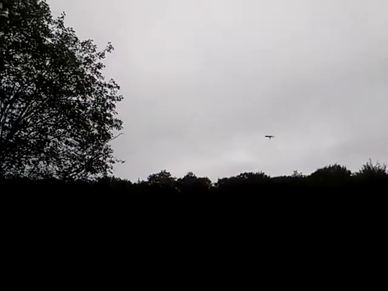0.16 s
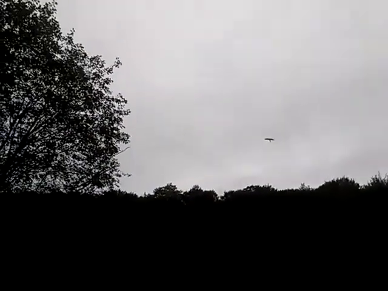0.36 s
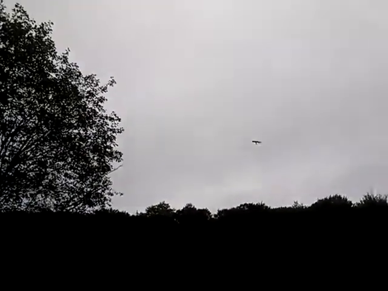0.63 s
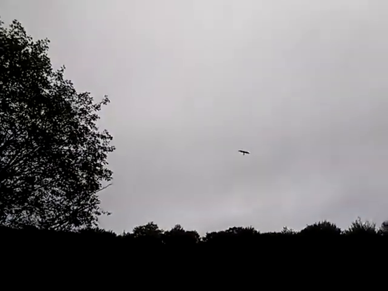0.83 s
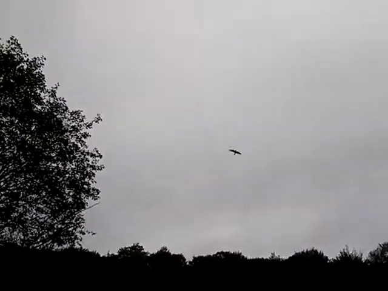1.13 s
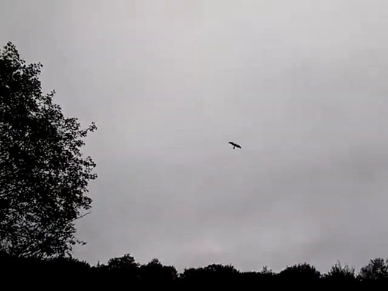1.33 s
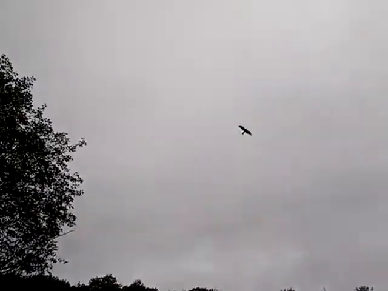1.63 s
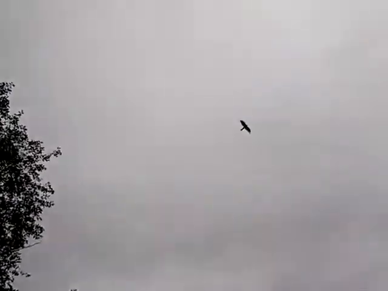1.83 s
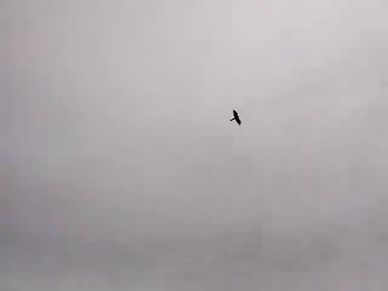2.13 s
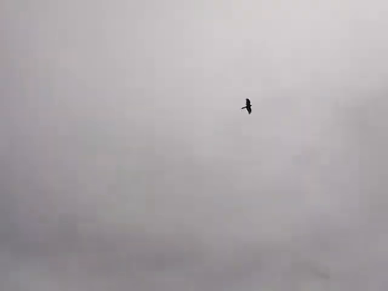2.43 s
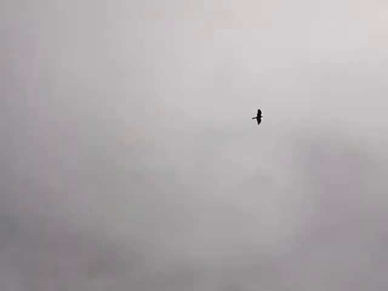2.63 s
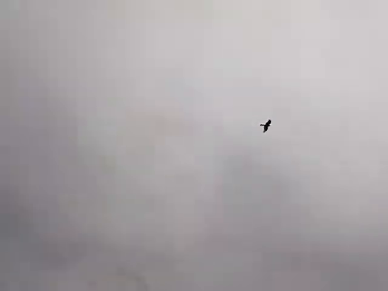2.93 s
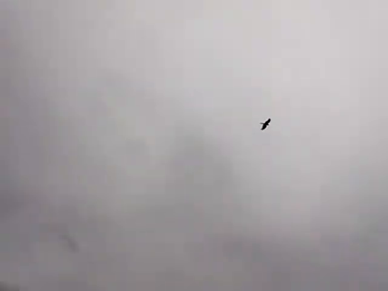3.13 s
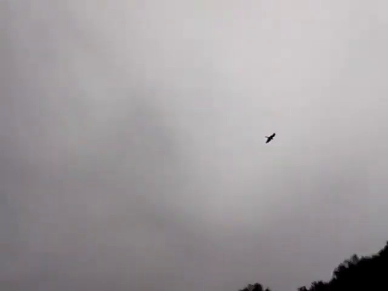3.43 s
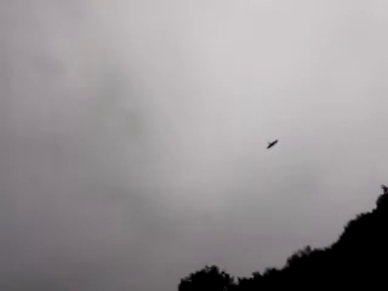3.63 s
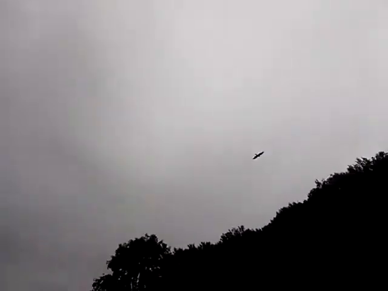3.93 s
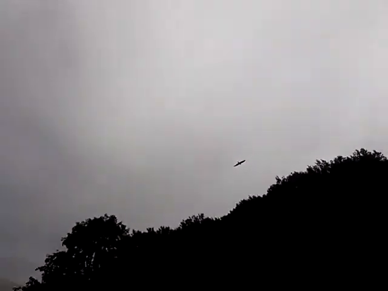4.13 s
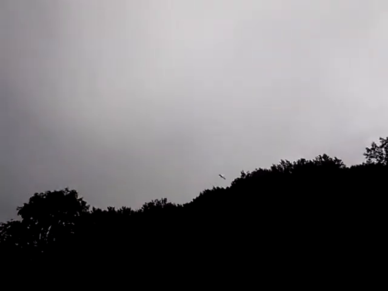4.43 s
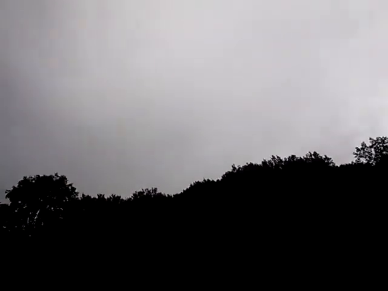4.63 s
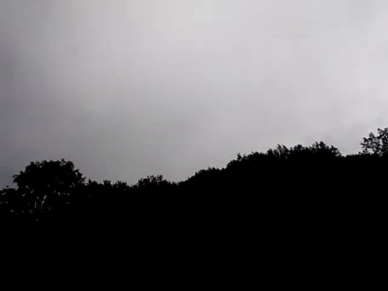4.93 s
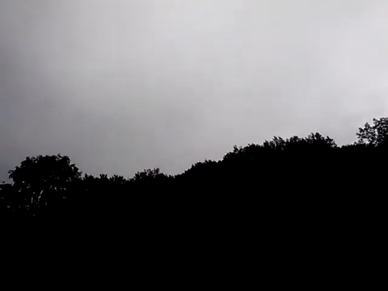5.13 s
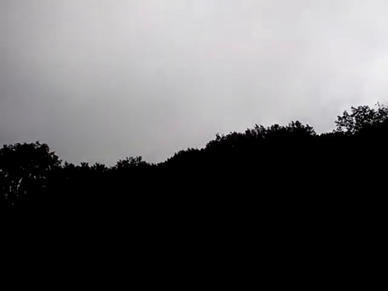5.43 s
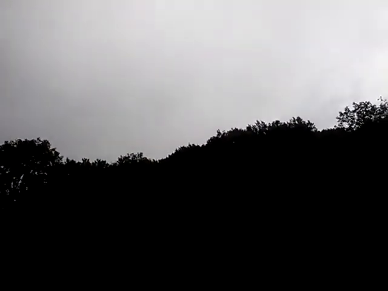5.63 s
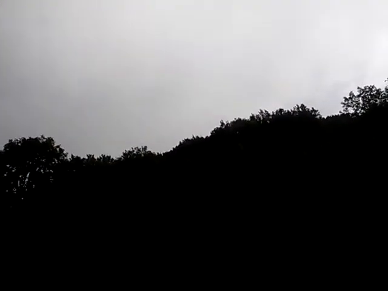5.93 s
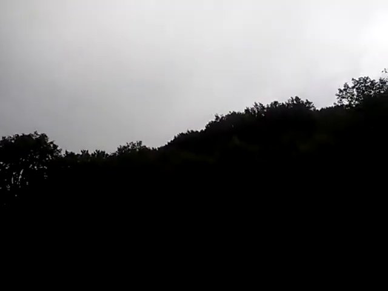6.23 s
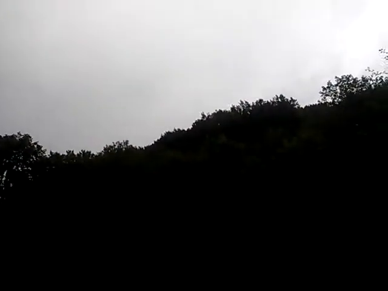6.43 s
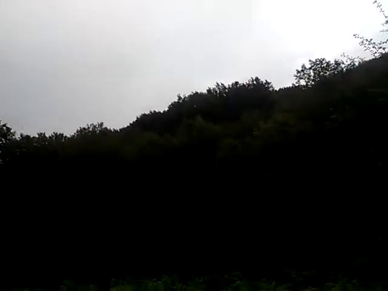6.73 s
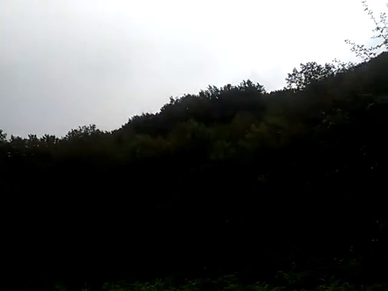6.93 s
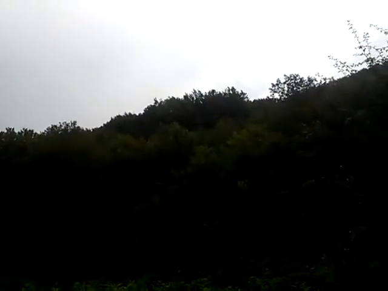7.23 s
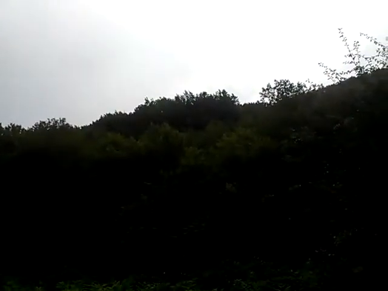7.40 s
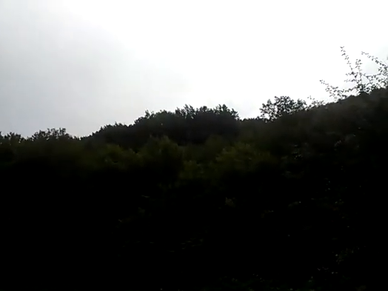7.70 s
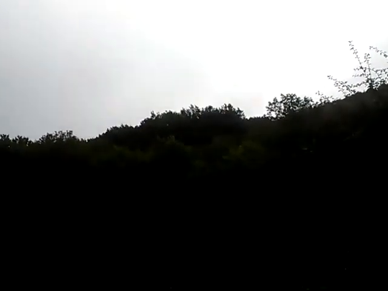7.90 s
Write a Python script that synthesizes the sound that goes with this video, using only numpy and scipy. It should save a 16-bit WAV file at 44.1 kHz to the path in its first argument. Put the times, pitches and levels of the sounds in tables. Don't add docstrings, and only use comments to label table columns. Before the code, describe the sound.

Outdoors by a wooded hill, a bird of prey mews five times: two strong, clear calls in open sky, then three weaker, more echoing ones from the trees. Leaves hiss faintly far off. At the hand-held microphone, light wind pops flutter between calls, a strap squeaks in small high creaks, and a jacket rustles most strongly near the end, after the last call.

```python
import sys
import numpy as np
from scipy import signal
from scipy.fft import rfft, irfft
from scipy.io import wavfile
from scipy.ndimage import uniform_filter1d, map_coordinates

SR = 44100
rng = np.random.default_rng(int(sys.argv[2]) if len(sys.argv) > 2 else 0)


def wrap_up_sound(samples):
    columns = np.atleast_2d(samples).T
    tamed = np.clip(columns, -1, 1)
    steps = np.round(tamed * 32767).astype(np.int16)
    wavfile.write(sys.argv[1], SR, steps)


def attenuation_scalar(level_db):
    decades = np.asarray(level_db, float) / 20
    return 10 ** decades


N = 355438
T = np.arange(N) / SR


def curve(table, column=1, off=-120):
    rows = np.array(table, float)
    return np.interp(T, rows[:, 0], rows[:, column], left=off, right=off)


def unit(x):
    return x / np.sqrt(np.mean(x ** 2))


def walk(rate):
    hold = max(int(SR / rate), 1)
    steps = np.repeat(rng.standard_normal(N // hold + 1), hold)
    slewed = uniform_filter1d(uniform_filter1d(steps, hold), hold)
    return unit(slewed[:N])


def swell(rows):
    gain = 0
    for peak_s, db, rise_s, fall_s in rows:
        away = np.where(T < peak_s, (peak_s - T) / rise_s, (T - peak_s) / fall_s)
        gain = gain + attenuation_scalar(db - 20 * np.minimum(away, 3) ** 2)
    return gain


def colour(x, points, lo_hz=0, hi_hz=SR):
    hz = np.arange(N // 2 + 1) * SR / N + 1e-3
    point_hz, point_db = np.transpose(points)
    gain = attenuation_scalar(np.interp(np.log(hz), np.log(point_hz), point_db))
    if lo_hz:
        across = np.clip(np.log(hz / lo_hz) / np.log(hi_hz / lo_hz), 0, 1)
        gain = gain * np.sin(np.pi * across)
    return irfft(rfft(x) * gain, N)


def band(x, hz, width_hz):
    return signal.lfilter(*signal.iirpeak(hz, hz / width_hz, fs=SR), x)


def wavelets(times, sizes, hz, spread_s, skew):
    half = 800
    out, k = np.zeros(N + 2 * half), np.arange(-half, half)
    u = k / SR
    bell = np.exp(-.5 * (u / spread_s[:, None]) ** 2)
    packet = bell * np.cos(2 * np.pi * hz[:, None] * u + skew[:, None])
    np.add.at(out, (times * SR).astype(int)[:, None] + k + half, sizes[:, None] * packet)
    return out[half:N + half]


def scatter(x, t60, first_s, density):
    u = np.arange(SR) / SR
    chance = rng.random((2, SR))
    hits = (chance[0] < density) * (chance[1] - .5)
    echo = hits * np.exp(-np.log(1000) * u / t60) * (u > first_s)
    return signal.fftconvolve(x, echo / np.sqrt(np.sum(echo ** 2)))[:N]


def leaves():
    # frequency in Hz, level in dB per Hz
    leaf_spectrum = [(25, -6), (100, -4.5), (300, -7), (900, -3), (1800, -4), (2700, -11), (3600, -8),
                     (4800, -12.5), (5900, -7), (7300, -17), (9500, -20), (12000, -21), (15500, -21.5)]
    # time in seconds, level in dB
    gusts = [(0.0, -73.5), (0.63, -68.5), (1.12, -73), (1.52, -74), (2.0, -66.5), (2.27, -71), (3.7, -73),
             (3.99, -68), (4.24, -71.5), (4.85, -70.5), (6.42, -70.5), (6.6, -71), (7.32, -72), (7.54, -67),
             (7.83, -71.5), (8.06, -71.5)]
    gust_db = curve(gusts) - np.mean(curve(gusts))
    out = 0
    for hz in 15 * 2. ** np.arange(11):
        flicker_db = 1.96 + 1.36 / (1 + hz / 150)
        hiss = colour(rng.standard_normal(N), leaf_spectrum, hz / 2, hz * 2)
        out = out + hiss * attenuation_scalar(gust_db / (1 + (hz / 2500) ** 2) + flicker_db * walk(8.2))
    return unit(out) * attenuation_scalar(-62.5)


def whine():
    # frequency in Hz, level in dB
    tones = [(12586, -94), (13017, -82.5)]
    out = 0
    for hz, db in tones:
        out = out + np.sqrt(2) * attenuation_scalar(db + 1) * np.sin(2 * np.pi * hz * T + .5 * walk(12))
    return out


def knock():
    count, first_s, every_s = 17, .391, .471
    level_db, pitch_hz, spread_s = -65, 49, 0.0083
    chance = rng.standard_normal((count, 3)).T
    s = first_s + every_s * np.arange(count)
    sizes = attenuation_scalar(level_db + 1.5 * chance[0])
    hz = pitch_hz * np.exp(0.12 * chance[1])
    return wavelets(s, sizes, hz, spread_s + 0 * s, np.pi + .4 * chance[2])


def wind():
    # time in seconds, peak in dB, frequency in Hz
    lone_pops = [(0.3637, -46.5, 247), (0.3986, -52, 549), (0.4237, -50, 260), (0.6907, -44, 216),
                 (0.6952, -46.5, 406), (0.7234, -45, 286), (2.5311, -43.5, 286), (2.5506, -36.5, 383),
                 (2.5576, -50, 314), (2.5845, -46, 323), (2.6232, -45, 257), (2.6337, -51, 451),
                 (2.6471, -49, 273), (2.7434, -51, 471), (2.7572, -49, 277), (2.7695, -43, 398),
                 (2.8236, -48, 283), (2.8282, -53, 494), (2.8416, -42, 466), (2.8472, -41.5, 350),
                 (2.8533, -55, 472), (2.8624, -51, 274), (3.8721, -51, 474), (3.8761, -53, 244),
                 (3.8866, -42, 269), (3.9841, -42.5, 268), (3.9912, -47, 550), (3.9993, -53, 433),
                 (4.0065, -47, 285), (4.2048, -42.5, 547), (4.3703, -41, 374), (5.4088, -48, 426),
                 (5.716, -38.5, 392), (5.7203, -46.5, 270), (6.4223, -53, 515), (7.3501, -47.5, 282),
                 (7.5582, -60, 675), (7.6073, -60, 584), (7.6321, -55, 820), (7.6365, -54, 710),
                 (7.6503, -43.5, 225), (7.6732, -52, 392)]
    # time in seconds, peak in dB, frequency in Hz
    gust_pops = [(1.7915, -34, 277), (1.7972, -37.5, 503), (1.8075, -59, 295), (1.8226, -41, 369),
                 (1.846, -44, 277), (1.8535, -46, 322), (1.873, -47, 302), (1.8815, -40.5, 373),
                 (1.89, -50, 263), (1.9133, -42.5, 346), (1.938, -47, 312), (1.943, -44, 189),
                 (1.9631, -41, 400), (1.9739, -53, 366), (1.9995, -47, 572), (2.005, -45.5, 228),
                 (2.026, -44, 272), (2.0326, -42, 455), (2.054, -48, 271), (2.1009, -47, 269),
                 (2.1049, -47, 344), (2.1254, -51, 265), (2.151, -48, 277), (2.1558, -42, 318),
                 (2.1872, -51, 328), (2.2138, -55, 369), (2.224, -55, 319), (2.2287, -48.5, 242)]
    s, db, hz = np.vstack([lone_pops, gust_pops]).T
    skew = -.2 + 0.7 * rng.standard_normal(len(s))
    return -wavelets(s, attenuation_scalar(db), .95 * hz, 0.35 / hz, skew)


def jacket():
    # peak time in seconds, level in dB, rise and fall in seconds
    rushes = [(4.38, -65, .06, .01), (4.586, -61, .07, 0.11), (4.744, -62.5, 0.032, 0.031),
              (4.81, -61, 0.026, .02), (5.8, -65, 0.18, 0.13), (5.95, -64, 0.044, 0.36),
              (6.42, -59, 0.071, 0.18), (6.49, -54, 0.13, 0.11), (6.65, -64, .2, 0.24),
              (6.908, -57.5, 0.15, 0.19), (7.152, -56, 0.15, 0.14), (7.208, -53, 0.017, 0.013),
              (7.3, -52.5, .04, 0.026), (7.35, -59, 0.028, 0.021), (7.395, -52.5, 0.09, 0.065),
              (7.5, -47, 0.15, 0.11), (7.63, -44, 0.14, 0.051), (7.69, -55.5, 0.087, 0.22),
              (8.06, -64.5, 0.22, .3)]
    # frequency in Hz, level in dB per Hz
    cloth_spectrum = [(180, -45), (300, -13.5), (581, -10), (641, -14), (756, -13), (1700, -16),
                      (5660, 1.5), (8140, -11), (8840, -21.5), (15500, -30)]
    # time in seconds, level in dB, frequency in Hz, length in ms
    cloth_ticks = [(2.965, -57.5, 4600, 4.4), (3.945, -45.5, 5550, 0.79), (6.411, -50, 5140, 1.5),
                   (6.842, -54, 4200, 1.1), (7.207, -52, 4520, 2.7), (7.298, -50, 3100, 4),
                   (7.389, -41, 5200, .8), (7.393, -42, 5260, 0.89), (7.476, -43.5, 5670, 4.2)]
    grains = rng.standard_normal(N) * attenuation_scalar(2.24 * walk(900) + 1.0 * walk(60))
    rustle = attenuation_scalar(-2.24) * swell(rushes) * unit(colour(grains, cloth_spectrum))
    s, db, hz, ms = np.transpose(cloth_ticks)
    ticks = wavelets(s, attenuation_scalar(db), hz, ms / 1000, 0 * s)
    return rustle + ticks * walk(6000)


def strap():
    # time in seconds, peak in dB, frequency in Hz, length in ms
    early_slips = [(0.0452, -53, 3548, 3.5), (0.082, -48, 3530, 4.9), (0.0914, -54, 3520, 5.7),
                   (3.4413, -52, 3450, 3), (4.5043, -52, 3436, 3.1), (4.5229, -49, 3464, 2.8),
                   (4.5293, -52, 3459, 3.8), (4.5387, -44, 3421, 3.8), (4.5459, -47, 3400, 5.2),
                   (4.5547, -56, 3409, 2.7), (4.5658, -42, 3437, 4.9), (4.579, -35.5, 3435, 3),
                   (4.5885, -44, 3400, 4.7), (4.6055, -46, 3429, 2.8), (4.6155, -54, 3441, 2.8),
                   (4.6218, -43, 3400, 3.9), (4.6451, -40.5, 3440, 13), (4.6704, -55, 3496, 1.6),
                   (4.6834, -58, 3465, 2.1), (4.7093, -56, 3526, 5.0), (4.7297, -39.5, 3467, 3.8),
                   (4.7401, -45, 3430, 8.5), (4.7579, -59, 3495, 3.2), (4.7918, -45.5, 3470, 4.8),
                   (4.8021, -56, 3451, 12), (4.8199, -47, 3386, 4.0), (4.8313, -57, 3512, 1.2),
                   (5.7478, -60, 3450, 3.4), (5.7588, -51, 3497, 3.3), (5.7782, -46, 3440, 3.4),
                   (5.787, -63, 3483, 3.4), (5.8194, -50, 3477, 2.8), (5.8386, -56, 3493, 2.1),
                   (5.8719, -50.5, 3471, 3.9), (5.9396, -44.5, 3470, 3.8), (5.9504, -46, 3492, 2.8),
                   (5.9949, -50, 3458, 2.4), (6.0477, -55, 3470, 3.9)]
    # time in seconds, peak in dB, Hz, length in ms
    late_slips = [(6.8418, -52, 3545, 1.6), (6.8569, -53, 3519, 1.9), (6.8745, -46, 3500, 3.1),
                  (6.8871, -39.5, 3570, 4), (6.9077, -60, 3448, 2.9), (6.9234, -50, 3520, 2.7),
                  (6.9305, -51, 3444, 2.8), (6.9375, -45, 3440, 2.9), (6.9517, -50, 3413, 1.6),
                  (6.9618, -50, 3540, 2.7), (7.0044, -51, 3534, 2.2), (7.0152, -47.5, 3517, 3),
                  (7.0781, -48, 3550, 2.6), (7.0902, -51, 3400, 3.7), (7.1433, -54, 3500, 4.7),
                  (7.1734, -54, 3523, 1.9), (7.1883, -51, 3515, 2.0), (7.1954, -51, 3424, 2.0),
                  (7.2064, -43.5, 3550, 3.7), (7.213, -50, 3500, 5.5), (7.2704, -53, 3470, 2.7),
                  (7.2771, -46, 3550, 2.5), (7.289, -57, 3494, 3.1), (7.299, -42, 3440, 1.2),
                  (7.312, -52, 3592, 3.5), (7.3238, -52, 3483, 2.9), (7.3337, -44, 3540, 5.8),
                  (7.3501, -53, 3540, 3.2), (7.3603, -47, 3500, 3.1), (7.3689, -49, 3455, 1.8),
                  (7.3826, -52, 3500, 4.2), (7.3892, -53, 3664, 1.2), (7.3974, -49, 3540, 4.0),
                  (7.41, -54, 3610, 1.3), (7.4223, -51, 3400, 5.4), (7.4346, -51, 3605, 1.8),
                  (7.4406, -54, 3552, 2.3)]
    # peak time in seconds, level in dB, rise and fall in seconds
    rubbing = [(.1, -62, .2, 0.22), (3.47, -73, .08, .08), (4.54, -53, 0.068, .3), (4.84, -58, 0.14, 0.055),
               (5.76, -55, 0.062, 0.054), (5.9, -63, 0.42, 0.33), (6.11, -47, 0.048, 0.4),
               (6.5, -47.5, 0.26, 0.12), (6.9, -50, 0.12, 0.19), (7.09, -52.5, 0.054, .05),
               (7.2, -50, 0.075, 0.068), (7.3, -51, 0.049, .4), (7.6, -68, .2, 0.11),
               (7.95, -59.5, 0.4, .5)]
    ring_hz, width_hz = 3456, 160
    s, db, hz, ms = np.vstack([early_slips, late_slips]).T
    slips = wavelets(s, attenuation_scalar(db - 1), hz, ms * 0.00048, 2 * np.pi * rng.random(len(s)))
    clicks = rng.standard_normal(N) * attenuation_scalar(3 * walk(200))
    ring = unit(band(band(clicks, ring_hz, 1.6 * width_hz), ring_hz, width_hz))
    patchy = attenuation_scalar(-0.5 * walk(45))
    return slips + ring * attenuation_scalar(-10.5) * swell(rubbing) * patchy


def harmonic_levels(hz, mew, facing, top_db):
    # frequency in Hz, gain in dB
    throat = [(1400, -8), (1750, -14), (2900, -11), (3250, -11.5), (3500, -3), (4500, 4), (5300, -1.5),
              (7000, -5)]
    brighten = 0.67
    first_db, fourth_db = facing
    level_db = curve(mew)
    db = [np.interp(k * hz, *np.transpose(throat)) for k in range(1, 5)]
    db[0] = db[0] + first_db
    db[1] = db[1] + curve(mew, column=2, off=0)
    db[3] = db[3] + fourth_db + brighten * (np.maximum.accumulate(level_db) - level_db.max())
    db = np.array(db + [db[3] + above for above in top_db])
    return db + level_db - 10 * np.log10(np.sum(attenuation_scalar(db) ** 2, axis=0))


def from_trees_and_hill(near, far):
    near, far = (map_coordinates(v, [np.arange(N) + 3 * walk(70)], order=3) for v in (near, far))
    hill = signal.sosfilt(signal.butter(1, 6500, fs=SR, output="sos"), far)
    trunks = scatter(near, t60=.14, first_s=.003, density=0.034)
    return trunks + scatter(hill, t60=.85, first_s=0.036, density=0.23)


def hawk():
    # time in seconds, pitch in Hz
    arches = [
        [(.245, 1320), (.315, 1567), (.38, 1675), (.46, 1748), (.6, 1772), (.67, 1739), (.78, 1742),
         (.829, 1640), (.865, 1490)],
        [(1.61, 1225), (1.666, 1575), (1.712, 1670), (1.75, 1707), (1.807, 1712), (1.845, 1745), (1.95, 1727),
         (2.069, 1629), (2.13, 1515)],
        [(3.77, 1300), (3.843, 1552), (3.918, 1594), (4.022, 1616), (4.055, 1605), (4.082, 1556), (4.111, 1586),
         (4.157, 1544), (4.195, 1465)],
        [(4.822, 1250), (4.875, 1510), (4.956, 1631), (5.047, 1693), (5.19, 1742), (5.291, 1722), (5.336, 1674),
         (5.385, 1535), (5.425, 1510)],
        [(6.035, 1390), (6.09, 1580), (6.14, 1665), (6.2, 1712), (6.291, 1737), (6.392, 1660), (6.44, 1732),
         (6.5, 1645), (6.54, 1540)],
    ]
    # time in seconds, level in dB, gape (second harmonic lift) in dB
    sky_mews = [
        [(.245, -72, 5), (.313, -47.5, 5), (.371, -43.5, 0.5), (.485, -39, 0.5), (.565, -39, 0),
         (.671, -38, 3.5), (.78, -40.5, -2), (.84, -42.5, 2.5), (.865, -64, 15)],
        [(1.62, -64, 4), (1.652, -48, 1.5), (1.69, -39.5, 10), (1.75, -39, 2), (1.819, -37.5, 3.5),
         (1.88, -34.5, 7.5), (1.95, -38, 5.5), (2.1, -41, 10.5), (2.13, -54, 9)],
    ]
    # time in seconds, level in dB, gape in dB
    tree_mews = [
        [(3.77, -63, 16), (3.811, -49.5, 1), (3.86, -42.5, 4.5), (3.921, -47.5, 5), (3.97, -42.5, 9),
         (4.045, -42.5, 5), (4.089, -44, 4), (4.168, -48, 7), (4.195, -62, 7)],
        [(4.822, -67, 11), (4.859, -50.5, 1), (4.935, -46, 5.5), (5.037, -44.5, 6), (5.21, -41, 1),
         (5.265, -44, -9), (5.29, -43.5, -0.5), (5.405, -46, -1), (5.425, -63, 19)],
        [(6.035, -67, 7), (6.072, -53, 0), (6.136, -47.5, -7), (6.193, -48, -4), (6.301, -45.5, -3.5),
         (6.413, -47, -11), (6.455, -46.5, -2), (6.518, -51, -3), (6.54, -78, -3)],
    ]
    # fundamental in dB, fourth harmonic in dB
    facings = [(-2.5, 0.5), (3.5, 2.5), (-1.5, -5), (1.5, 1), (1.5, 1)]
    # harmonics 5, 6 and 7 over the fourth in dB, hill echo in dB
    colours = [(-13.5, -20, -34, -18.5), (-10, -19.5, -30, -19), (-12.5, -16.5, -30, -18.5),
               (-10.5, -19, -33, -13.5), (-10.5, -23.5, -35, -8.5)]
    # straight path in dB, near trunks in dB, pitch flutter share, waver in dB, throb in dB
    places = [
        (0, -17, .002, 1.2, .8),
        (0, -17, .0015, 1.2, .8),
        (-1, -13, .002, 2.2, 1.2),
        (-1, -8, .004, 1.2, 2.8),
        (-1, -9, .005, 1.2, 3.5),
    ]
    # multiple of the pitch, level in dB
    rasp_lines = [(2.5, -5), (3.5, 0), (4.5, -20)]
    # peak time in seconds, level in dB, rise and fall in seconds
    hoarse_bouts = [(.49, -65, .1, .1), (.57, -56, .05, .06), (.64, -53.5, .06, .07),
                    (.77, -54, 0.093, 0.089), (1.81, -56.5, 0.07, 0.049), (1.9, -54.5, 0.035, 0.045),
                    (2.0, -66, 0.13, 0.066), (4.16, -68, .12, 0.033), (5.265, -63, 0.14, 0.053),
                    (5.38, -63, 0.12, .04), (6.3, -63, .05, 0.029), (6.41, -73, 0.096, 0.092)]
    slur_s = .018
    turn_s = .16
    throb_hz, throb_width_hz = 90, 70
    breath_db, breath_hz, breath_width_hz = -24.5, 5630, 2500

    flutter = walk(220)
    waver = [walk(40) for _ in range(10)]
    drift = [walk(200) for _ in rasp_lines]
    hoarse = swell(hoarse_bouts)
    beat = band(rng.standard_normal((8, N)), throb_hz, throb_width_hz)
    throb = unit(beat[:-1] + beat[-1])
    hiss = band(rng.standard_normal(N), breath_hz, breath_width_hz)
    breath = unit(band(hiss, breath_hz, breath_width_hz))
    twigs = signal.butter(2, 2400, "high", fs=SR, output="sos")

    direct, near, far = 0, 0, 0
    for arch, mew, facing, (*top_db, hill_db), place in zip(
            arches, sky_mews + tree_mews, facings, colours, places):
        straight_db, trees_db, share, waver_db, throb_db = place
        hz = uniform_filter1d(np.interp(T, *np.transpose(arch)), size=int(slur_s * SR))
        phase = 2 * np.pi * np.cumsum(hz * (1 + share * flutter)) / SR
        level_db = curve(mew)
        turned = np.clip((T - mew[0][0]) / turn_s, .2, 1)
        voice = 0
        for k, db in enumerate(harmonic_levels(hz, mew, facing, top_db)):
            moving_db = db + waver_db * waver[k] + throb_db * turned * throb[k]
            voice = voice + attenuation_scalar(moving_db) * np.sin((k + 1) * phase)
        for (order, rasp_db), slip, shake in zip(rasp_lines, drift, waver[7:]):
            gain = hoarse * (level_db > -100) * attenuation_scalar(rasp_db + 3 * shake)
            voice = voice + gain * np.sin(order * phase + 1.6 * slip)
        voice = np.sqrt(2) * voice + attenuation_scalar(level_db + breath_db) * breath
        direct = direct + attenuation_scalar(straight_db) * voice
        near = near + attenuation_scalar(trees_db) * signal.sosfilt(twigs, voice) * turned
        far = far + attenuation_scalar(hill_db) * voice
    return direct + from_trees_and_hill(near, far)


def scene():
    mono = leaves() + whine() + knock() + wind() + jacket() + strap() + hawk()
    return np.tile(mono, (2, 1))


def drop_weak_bands(x):
    # frequency in Hz, level in dB under the whole sound
    weakest = [(2300, -60), (2900, -39), (3900, -31), (4300, -28.5), (4650, -33), (5000, -55), (7200, -55),
               (7800, -43), (9500, -44), (12000, -46), (15000, -47)]
    size, scatter_db = 16, 2.5
    hz, _, z = signal.stft(x, SR, nperseg=2048)
    power = np.abs(z[:-1]) ** 2
    bands = power.reshape(-1, size, power.shape[1]).sum(axis=1)
    floor = attenuation_scalar(np.interp(hz[size // 2::size], *np.transpose(weakest))) ** 2
    luck = uniform_filter1d(rng.standard_normal(bands.shape), size=2) * np.sqrt(2)
    limit = floor[:, None] * power.sum(axis=0) * attenuation_scalar(scatter_db * luck) ** 2
    z[:-1] *= np.repeat(bands > limit, size, axis=0)
    return signal.istft(z, SR, nperseg=2048)[1][:N]


def top_cut(x):
    return signal.sosfilt(signal.butter(12, 15710, fs=SR, output="sos"), x)


def record(dry):
    mix = np.tile(drop_weak_bands(dry[0]), (2, 1))
    return top_cut(mix)


dry = scene()
out = record(dry)
wrap_up_sound(out)
```